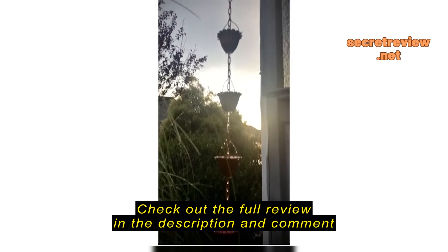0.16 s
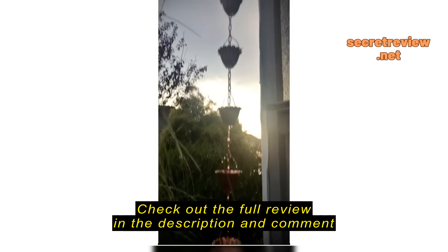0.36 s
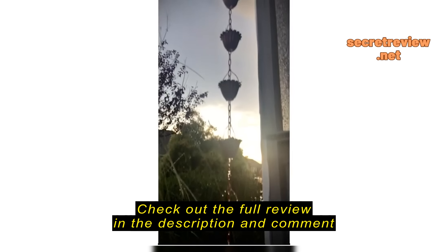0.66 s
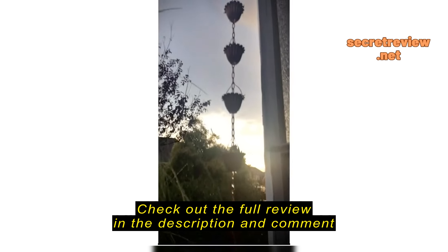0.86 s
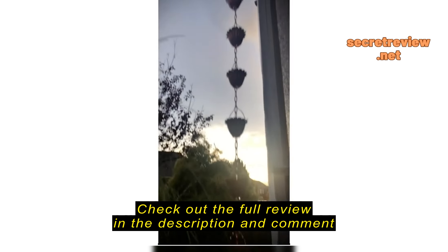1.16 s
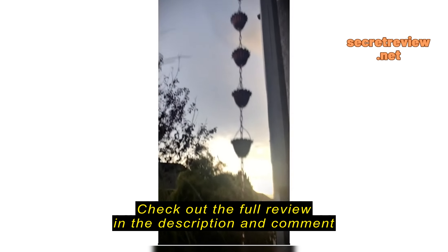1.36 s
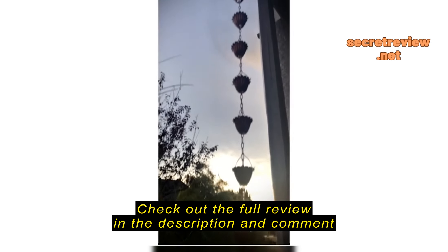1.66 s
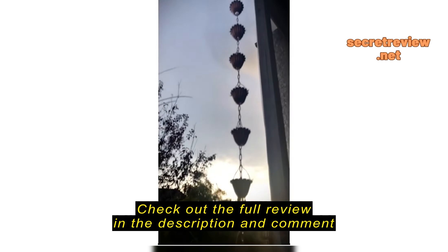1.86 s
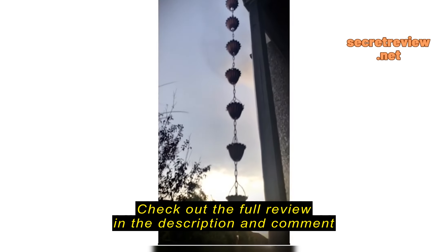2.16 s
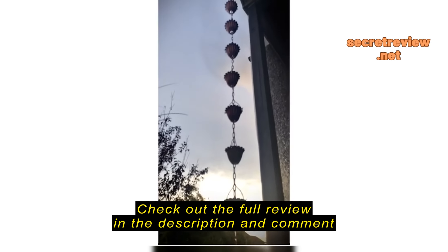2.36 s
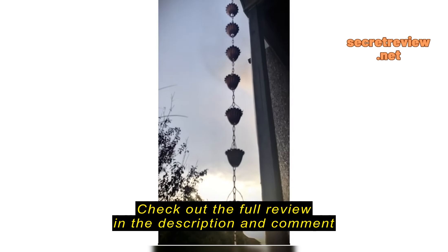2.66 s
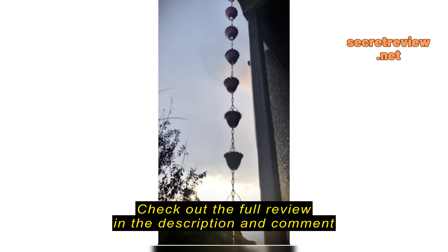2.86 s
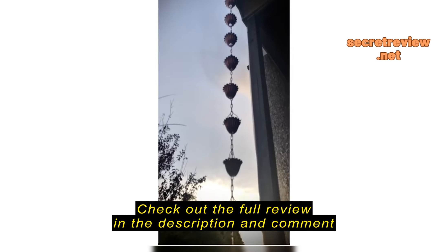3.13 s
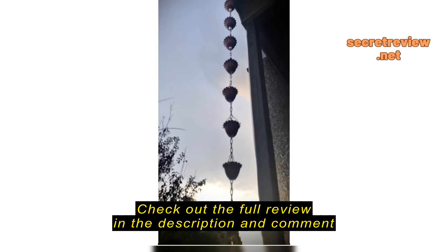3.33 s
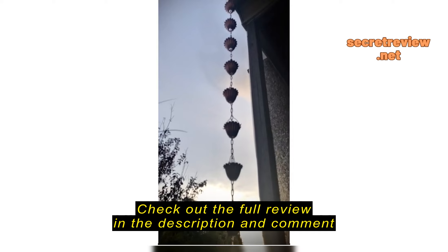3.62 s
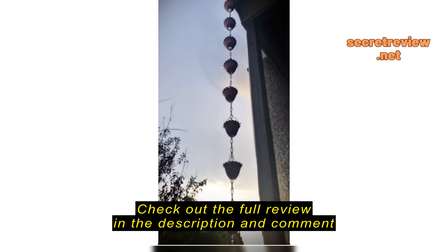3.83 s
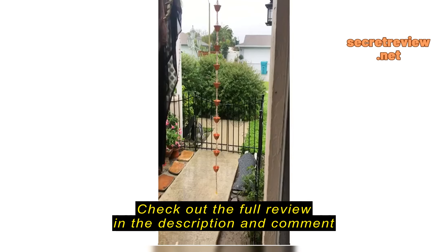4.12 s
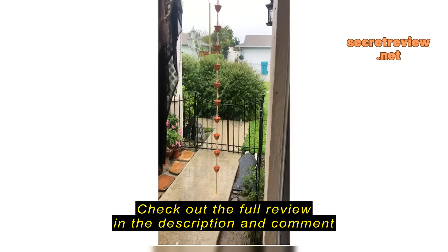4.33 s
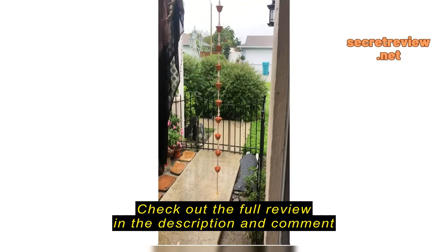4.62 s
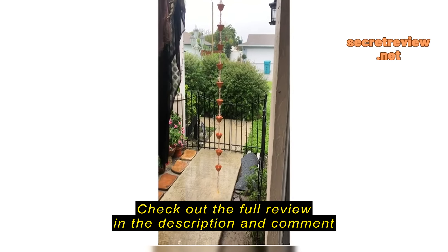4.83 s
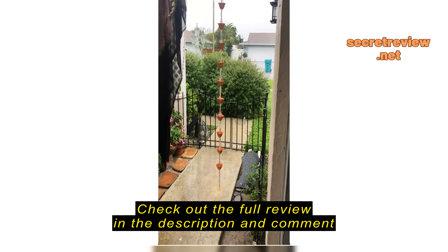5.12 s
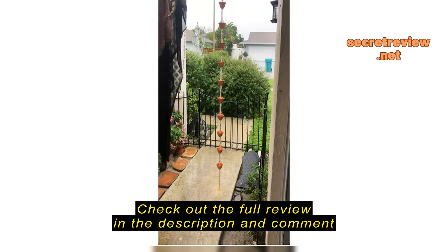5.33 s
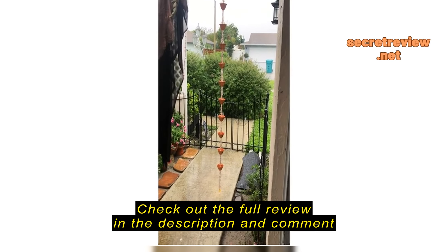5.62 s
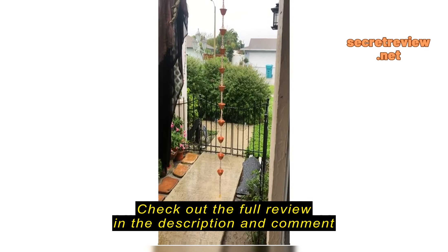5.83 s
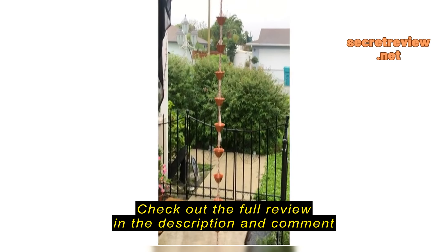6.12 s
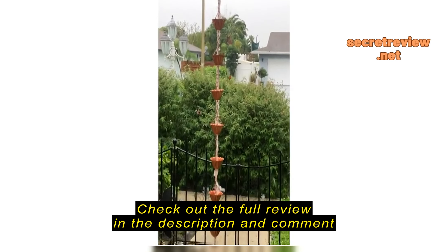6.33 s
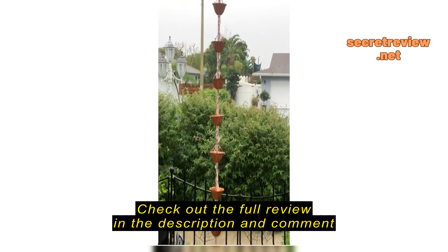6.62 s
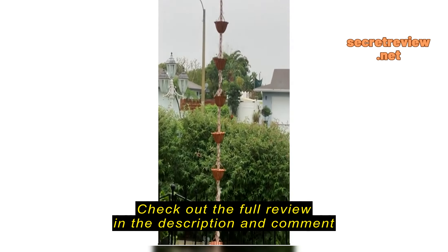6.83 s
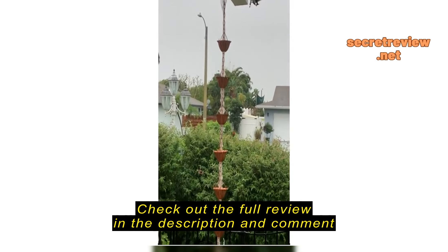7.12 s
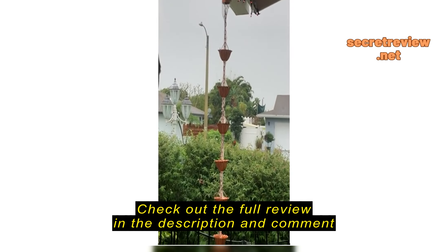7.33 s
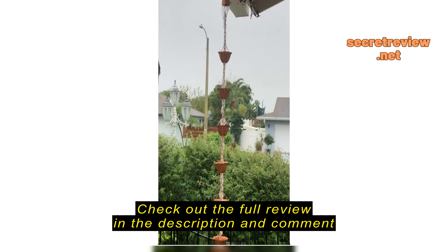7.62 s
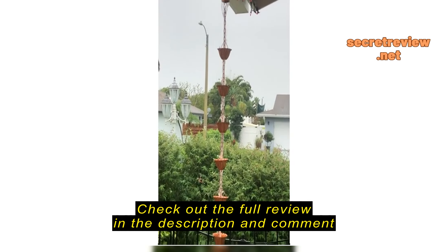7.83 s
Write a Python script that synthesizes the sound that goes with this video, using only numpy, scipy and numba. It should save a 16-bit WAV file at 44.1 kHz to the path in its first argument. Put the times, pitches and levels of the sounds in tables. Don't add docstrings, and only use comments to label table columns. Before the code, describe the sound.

Quiet evening rumble with insects, faint hum and stray drips cuts briefly to silence, then close rain splashes and gurgles down a metal cup chain.

```python
import sys
import numpy as np
from scipy import signal
from scipy.fft import rfft, irfft
from scipy.io import wavfile
from scipy.ndimage import uniform_filter1d
from numba import njit

SR = 44100
rng = np.random.default_rng(int(sys.argv[2]) if len(sys.argv) > 2 else 0)


def digitize_waveform(pressure):
    field = np.atleast_2d(pressure).T
    bounded = np.clip(field, -1, 1)
    quanta = np.round(bounded * 32767).astype(np.int16)
    wavfile.write(sys.argv[1], SR, quanta)


def decibels_to_gain(level_db):
    exponent = np.asarray(level_db, float) / 20
    return 10 ** exponent


N = 351918
T = np.arange(N) / SR
EVENING_END_S, RAIN_START_S = 3.9855, 4.0565
TOP_HZ = 16000


def level(x, db):
    return x * decibels_to_gain(db) / np.sqrt(np.mean(x ** 2))


def follow(table):
    return np.interp(T, *np.transpose(table))


def columns(table):
    return np.array(table, float).T.copy()


def colour(x, points):
    hz, db = np.transpose(points)
    f = np.maximum(np.fft.rfftfreq(N, 1 / SR), 1)
    return irfft(rfft(x) * decibels_to_gain(np.interp(np.log(f), np.log(hz), db)), N)


def peak(x, hz, width):
    f = np.fft.rfftfreq(N, 1 / SR)
    return irfft(rfft(x) / (1 + ((f - hz) / (width / 2)) ** 2), N)


def walk(rate):
    hold = int(SR / rate)
    steps = np.repeat(rng.standard_normal(N // hold + 1), hold)
    return 1.353 * uniform_filter1d(uniform_filter1d(steps, hold), hold)[:N]


def breathing(x, flicker_db, rate, order):
    spectrum, out, last = rfft(x), x, walk(rate)
    octave = np.log2(np.fft.rfftfreq(N, 1 / SR) + 1)
    for centre in np.arange(*order) / 2:
        new = walk(rate)
        band = irfft(spectrum * np.clip(1 - 2 * abs(octave - centre), 0, 1), N)
        out = out + (decibels_to_gain(flicker_db * (new + last)) - 1) * band
        last = new
    return out


@njit
def ring(s, hz, cycles, size, glide, rise):
    out = np.zeros(N)
    for e in range(len(s)):
        start, span = int(s[e] * SR), int(cycles[e] * SR / hz[e]) + 2
        z, w, late = size[e] + 0j, 2 * np.pi * hz[e] / SR, 1.
        p, turn = np.exp(1j * w - np.log(1000) / span), np.exp(1j * w * glide / span)
        for k in range(start, min(start + span, N)):
            out[k] += z.imag * (1 - late)
            z *= p
            p *= turn
            late *= np.exp(-1 / (rise * span))
    return out


def patter(count, spread_db, cycles):
    u = rng.random((count, 3)).T
    hz = 900 * 18 ** u[1]
    size = decibels_to_gain(spread_db * np.minimum(-np.log(1 - u[2]), 3.5)) * hz / 1000
    return level(ring(u[0] * N / SR, hz, cycles + 0 * hz, size, 0.26, 0.025), 0)


def drops(table, cycles, glide, spread, rise, crack_db):
    s, db, hz = columns(table)
    out = ring(s, hz, cycles + 0. * s, decibels_to_gain(db + 4.0), glide, rise)
    out += ring(s, 1.03 * hz, 3.5 + 0 * s, decibels_to_gain(db + crack_db), .1, .08)
    u = rng.random((len(s), 5, 2))
    pitch = np.clip(hz[:, None] * np.exp(spread * (u[..., 0] - .45)), 800, TOP_HZ)
    late = 0.1486 * u[..., 1] * (cycles / hz)[:, None]
    times, size = (s[:, None] + late).ravel(), np.repeat(decibels_to_gain(db - 5), 5)
    return out + ring(times, pitch.ravel(), np.full(size.size, .6 * cycles), size, glide, rise)


def splashes(table, shower_db, cycles, spray_s, spray_width):
    s, db, hz = columns(table)
    turns = cycles + 0 * s
    out = ring(s, hz, turns, decibels_to_gain(db + 5.5), 0.076, 0.097)
    out += ring(s + .0024, hz, turns, decibels_to_gain(db), 0.098, 0.054)
    out += ring(s, 1.14 * hz.clip(0, 12000), 7.7 + 0 * s, decibels_to_gain(db - 1.5), .1, 0.096)
    spray_db = shower_db - 0.01 * (db + 35.0)
    u = rng.random((len(s), 110, 3))
    late = 3 * spray_s * u[..., 0] ** 1.5
    pitch = np.clip(hz[:, None] * np.exp(spray_width * (u[..., 1] - .62)), 900, 16500)
    size = decibels_to_gain((db + spray_db)[:, None] - 3.5 + 9.7 * u[..., 2]) * np.exp(-late / spray_s)
    times = (s[:, None] + late).ravel()
    return out + ring(times, pitch.ravel(), np.full(size.size, 17.0), size.ravel(), 0.31, 0.065)


def porch(x, echo_db):
    t = T[:SR // 4]
    t60_s = 0.1
    tail = rng.standard_normal(len(t)) * decibels_to_gain(-60 * t / t60_s) * (t > .002)
    return x + decibels_to_gain(echo_db) * signal.fftconvolve(x, tail / np.sqrt(np.sum(tail ** 2)))[:N]


def tone(hz, width, db):
    phase = 2 * np.pi * np.cumsum(hz + width * walk(7)) / SR
    return np.sqrt(2) * np.sin(phase) * decibels_to_gain(db + 1.4 * walk(7.4))


def beat(hz, top_s):
    return 20 * np.log10(1 + 0.28 * np.cos(2 * np.pi * hz * (T - top_s)))


# frequency in Hz, level in dB per Hz.
TOWN_AIR = [(18, -40), (30, -21), (55, -1), (109, -1.5), (311, -9), (374, -8.5), (437, -12), (569, -15.5),
            (913, -16), (1280, -21.5), (1390, -22), (2900, -28), (6210, -33.5), (12000, -43),
            (16000, -51.5)]


def town():
    air = colour(rng.standard_normal(N) + 0.31 * patter(count=4000, spread_db=3.0, cycles=42.0), TOWN_AIR)
    return level(breathing(air * decibels_to_gain(.5 * walk(15)), 0.49, 11, order=(16, 29)), -45.7)


# pitch in Hz, width in Hz, level in dB.
INSECTS = [
    (6170, 98, -75),
    (5100, 480, -74),
    (1282, 6.6, -70.5),
]


def insects():
    return sum(level(peak(rng.standard_normal(N), hz, width) * decibels_to_gain(1.7 * walk(5.7)), db)
               for hz, width, db in INSECTS)


def evening_hum():
    swell = np.exp(-((T - 3.34) / 0.53) ** 2)
    compressor_db = -66 + 10.5 * swell
    mains_db = -53.5 + beat(1.74, 2.01)
    return tone(118.4, 2.17, mains_db) + tone(377, 2.41, compressor_db)


# start in seconds, peak in dB, pitch in Hz.
PLOPS = [(.266, -50, 990), (.339, -41, 1085), (.5084, -51, 985), (.648, -43, 1700), (.657, -45, 1720),
         (.665, -40, 1055), (1.3049, -51, 1050), (2.0448, -49, 1080), (2.332, -38.5, 1070),
         (3.7708, -51, 960)]
DRIPS = [(0.3336, -52, 3200), (0.384, -36, 6800), (0.3987, -42, 3640), (0.417, -43, 3870),
         (0.429, -43, 3070), (0.4928, -44, 3080), (0.508, -46, 3900), (0.5384, -47, 3490),
         (0.7138, -52, 3910), (0.8315, -47, 5240), (1.49, -53, 4600), (1.6656, -46, 6700),
         (2.068, -46, 3720), (2.074, -44, 6170), (2.2244, -46, 6260), (2.2413, -41, 6400),
         (2.3042, -49, 2590), (2.5555, -44, 2690), (2.8784, -49, 3650), (3.2685, -37, 6510),
         (3.3578, -49, 2950)]
TICKS = [(0.2014, -43, 10200), (0.2214, -46, 13700), (0.383, -42, 8300), (0.603, -56, 8350),
         (0.831, -42, 14500), (0.8312, -48, 10500), (1.2176, -57, 9540), (1.5294, -51, 8000),
         (1.7335, -52, 8790), (2.1455, -55, 10400), (2.2408, -49, 9110), (2.4204, -55, 12800),
         (3.0964, -56, 9060), (3.1507, -50, 10200), (3.268, -53, 8010), (3.8701, -65, 8210)]
# start in seconds, peak in dB, pitch in Hz.
PINGS = [(.400, -43, 4700), (.420, -47, 4800), (.434, -46, 2950), (.493, -45, 3900), (.509, -47, 2250),
         (.511, -46, 4800), (.479, -47, 1500), (.604, -49, 6600), (1.8495, -41, 1650), (1.8525, -39, 2150),
         (3, -50, 3200), (2.656, -45, 2320), (2.656, -36, 2900), (2.659, -37, 3700), (2.656, -49, 1700),
         (3.5795, -44, 3000), (3.5805, -40, 3880), (3.5805, -41, 4700), (3.582, -46, 6700)]
# start in seconds, peak in dB, first pitch in Hz, climb
CHIRPS = [
    (.473, -44, 1156, 1.0),
    (1.53, -36.5, 3600, 0.43),
]


def drips():
    deep = drops(PLOPS, 70, .07, .14, .1, -14)
    for *row, climb in CHIRPS:
        deep = deep + drops([row], 40, climb, .3, .14, -14)
    s, db, hz = columns(PINGS)
    deep = deep + ring(s, hz, 40 + 0 * s, decibels_to_gain(db + 6), 0.038, 0.092)
    thin = drops(DRIPS, 40, .15, .45, .08, -6) + drops(TICKS, 30, .1, .7, .05, 1)
    return porch(decibels_to_gain(-0.5) * deep + decibels_to_gain(3.0) * thin, echo_db=-8)


def evening():
    return town() + insects() + evening_hum() + drips()


# frequency in Hz, level in dB per Hz.
RAIN = [(18, -39), (30, -15), (97, -0.5), (188, -6.5), (247, -8.5), (314, -12), (369, -8.5), (588, -13.5),
        (1400, -11), (1820, -43), (3080, -120)]


def rain_rush():
    rush = level(colour(rng.standard_normal(N), RAIN), -47)
    low = signal.butter(4, 1000, fs=SR, output="sos")
    return signal.sosfilt(low, breathing(rush, 0.3, 8, order=(14, 21)))


# pitch in Hz, width in Hz, level in dB, beat in Hz,
# top of the beat in seconds.
HUM_LINES = [(119.2, 1.17, -54, 0.93, 5.94), (96.9, 0.91, -52.5, 0.78, 7.5), (241.2, 0.14, -52, 0.32, 5.52),
             (482.2, 1.04, -61, 0.6, 6.18), (262, 1.22, -59.5, 0.6, 5.65), (187.3, 1.47, -63.5, 0.53, 7.6)]
# time in seconds, level in dB.
MAINS = [(4.06, -44.5), (4.7, -47.5), (5.0, -52), (5.45, -46.5), (5.7, -53), (5.95, -53), (6.4, -64),
         (6.9, -47), (7.5, -51), (7.98, -49)]
# pitch in Hz, width in Hz, level at full load in dB.
COMPRESSOR = [(378.6, 1, -51.5), (362.4, 0.58, -53), (286.2, 0.88, -57.5)]
# time in seconds, level in dB.
LOAD = [(4.06, -2.5), (4.5, -0.5), (4.72, -8.5), (4.9, -1.5), (5.3, -8.5), (6.25, 1), (6.5, -3.5),
        (6.75, -13), (7.98, -16)]


def machines():
    out = tone(58.9, 0.66, follow(MAINS))
    for hz, width, db, beat_hz, top_s in HUM_LINES:
        out = out + tone(hz, width, db + beat(beat_hz, top_s))
    load_db = follow(LOAD)
    for hz, width, db in COMPRESSOR:
        out = out + tone(hz, width, db + load_db)
    rattle = level(peak(rng.standard_normal(N), 515, 150), -56)
    return out + rattle * decibels_to_gain(1.4 * load_db)


# frequency in Hz, level in dB per Hz.
SPRAY = [(470, -34), (800, -15), (1120, -11), (1520, -4), (2500, -10.5), (3590, -2), (4160, -2),
         (5200, -0.5), (7460, -8), (9440, -3), (12200, -7), (14700, -6), (15800, -6.5)]
# time in seconds, flow in dB.
FLOW = [(4.06, -0.5), (4.25, -2), (4.45, 0), (4.6, -1.5), (4.85, -1), (5.15, -1), (5.3, 1.5), (5.55, -1),
        (5.9, 0.5), (6.2, -1), (6.55, -1), (6.9, -0.5), (7.15, -0.5), (7.4, 0.5), (7.58, 1), (7.7, -1.5),
        (7.98, 1)]
# time in seconds, level in dB.
MIST = [(4.06, -1.5), (4.2, 0), (4.3, 0.5), (4.42, 0.5), (4.6, 1), (4.67, -1), (5.0, -0.5), (5.1, 1.5),
        (5.32, -4), (5.45, -0.5), (5.65, -2), (6.2, 1), (6.68, -0.5), (7.0, 0), (7.41, -1), (7.53, 2.5),
        (7.7, -1.5), (7.98, 1)]
FLOW_HZ = [1000, 2800, 7500, 17000]
# level at flow 0 in dB, change in dB per dB of flow.
WATERS = [
    (-48.5, -0.5),
    (-45, 1),
    (-47.5, 0.5),
]


def running_water():
    grains = rng.standard_normal(N) + 0.3 * patter(count=6000, spread_db=1.5, cycles=16.5)
    grains = grains + 0.31 * patter(count=2500, spread_db=3.5, cycles=29.0)
    water = breathing(colour(grains, SPRAY) * decibels_to_gain(.45 * walk(24)), 1.14, 18, order=(20, 29))
    flow_db, out = follow(FLOW), 0
    for lo, hi, (db, follows) in zip(FLOW_HZ, FLOW_HZ[1:], WATERS):
        band = signal.sosfilt(signal.butter(3, [lo, hi], "band", fs=SR, output="sos"), water)
        swell_db = follows * flow_db
        if lo == FLOW_HZ[2]:
            swell_db = swell_db + follow(MIST)
        out = out + level(band, db) * decibels_to_gain(swell_db)
    return out


# start in seconds, peak in dB, pitch in Hz.
SNAPS = [(4.1651, -29, 14500), (4.302, -31, 11000), (4.46, -33, 13500), (4.817, -31, 5500),
         (5.0526, -31, 14400), (5.2875, -30, 14000), (5.3772, -19, 5900), (5.3815, -25, 5600),
         (6.0872, -23, 6600), (6.5938, -28, 11500), (7.025, -33, 11000), (7.512, -24, 11500)]
SPILLS = [(4.375, -42, 6000), (4.378, -42, 10000), (4.565, -39, 6000), (4.575, -40, 13500),
          (5.725, -39, 6000), (5.765, -42, 12500), (6.395, -42, 13000), (6.60, -41, 6000),
          (6.795, -43, 6000), (6.80, -42, 14000), (7.135, -43, 14000), (7.515, -40, 13000)]


def snaps_and_spills():
    s, db, hz = columns(SNAPS)
    return ring(s, hz, 16 + 0 * s, decibels_to_gain(db + 5), .1, .1) + splashes(SPILLS, 2.0, 14, .03, .7)


def slops(count):
    u = rng.random((count, 3))
    s = RAIN_START_S + u[:, 0] * (T[-1] - RAIN_START_S)
    return np.c_[s, -39 + 1.5 * u[:, 1], 3500 * 4 ** u[:, 2]]


# start in seconds, peak in dB, pitch in Hz.
SLAPS = [(4.0726, -31, 3750), (4.1305, -31, 6440), (4.2572, -29.5, 4860), (4.2994, -30, 5600),
         (4.5624, -37, 5380), (4.7039, -22.5, 5360), (4.774, -24.5, 5640), (4.8178, -29, 4970),
         (5.0862, -24.5, 6400), (5.2171, -11.5, 5560), (5.377, -25, 5470), (5.4428, -29, 3580),
         (5.47, -29.5, 4530), (5.5767, -33, 5000), (5.7269, -24.5, 5040), (5.753, -26, 5120),
         (6.0866, -20, 5160), (6.3264, -29, 5030), (6.418, -26.5, 5500), (6.5925, -29, 5300),
         (6.612, -26, 4760), (6.7017, -27, 5850), (6.9715, -28, 6200), (7.0474, -25, 6230),
         (7.229, -28, 3640), (7.2797, -22.5, 5800), (7.437, -31, 4270), (7.5105, -22, 5470),
         (7.644, -26, 6560), (7.7749, -22.5, 5250)]
SPITS = [(4.0736, -28.5, 8850), (4.1655, -36, 15000), (4.2642, -28.5, 10400), (4.4553, -31.5, 8990),
         (4.5894, -28, 9720), (4.78, -26.5, 11800), (5.0524, -28, 14400), (5.0789, -29.5, 9900),
         (5.2165, -21, 9500), (5.2869, -30, 14000), (5.3482, -22.5, 15100), (5.3758, -23, 8500),
         (5.444, -23, 15300), (5.579, -28, 10100), (5.7453, -26, 8300), (6.0581, -30, 10400),
         (6.0871, -23, 10300), (6.1898, -26.5, 13200), (6.2138, -31, 11500), (6.2834, -27, 8800),
         (6.3946, -26.5, 11700), (6.5934, -28, 8700), (6.7042, -30.5, 10740), (6.983, -29.5, 9360),
         (7.0469, -23, 9300), (7.3648, -26, 13600), (7.468, -30, 7700), (7.512, -23, 12700),
         (7.5418, -27, 10300), (7.8625, -29, 10600)]
DABS = [(4.8913, -34, 4870), (4.94, -38, 5870), (5.0694, -32, 3530), (5.0984, -30, 6550),
        (5.6715, -36, 3810), (6.0496, -34, 3560), (6.1874, -33, 5200), (6.2208, -33, 4240),
        (6.2394, -37, 5840), (6.394, -40, 4650), (6.54, -34, 3850), (6.7894, -38, 4850), (7.144, -32, 3600),
        (7.3402, -33.5, 3770), (7.3672, -28, 6390), (7.4674, -30, 3450), (7.862, -35, 3580),
        (7.9294, -30.5, 3680)]
FLECKS = [(4.3016, -32, 11400), (4.3111, -26, 9300), (4.555, -30, 10200), (4.7022, -30, 9750),
          (4.9367, -35, 8500), (4.9761, -33, 8440), (5.0874, -31, 9510), (5.0964, -27, 8860),
          (5.3574, -26, 9870), (5.4714, -27, 9500), (5.6635, -35, 8340), (5.7029, -30, 9610),
          (5.8092, -35, 11000), (5.9035, -36, 9770), (6.5724, -35, 11200), (6.8608, -31, 9660),
          (6.9197, -35, 8800), (6.9406, -35, 10200), (7.1062, -29, 8490), (7.1332, -29, 10900),
          (7.1896, -30, 10200), (7.2489, -34, 10100), (7.341, -30, 8530), (7.4465, -30, 9670),
          (7.5894, -32, 14000), (7.6474, -28, 12100), (7.7742, -30, 7840), (7.9444, -36, 9580)]
SPLATS = [(5.2175, -28.5, 2120), (5.229, -32, 2200), (5.232, -27, 3950), (5.2195, -25, 3930),
          (6.0866, -34.5, 3620), (7.5105, -30, 2600), (7.521, -29, 5000), (7.776, -32, 3400)]
GURGLES = [(4.116, -34, 1780), (4.7526, -35, 1980), (4.7844, -35, 1870), (5.135, -39, 1450),
           (5.344, -36, 1810), (5.6194, -32, 1610), (5.751, -42, 2490), (5.8197, -34, 1730),
           (5.9259, -32, 1910), (6.0646, -33, 1360), (6.1095, -37, 1840), (6.316, -33, 1510),
           (6.5894, -36, 1640), (7.1157, -35, 1530), (7.775, -36, 1560)]


def slugs():
    out = splashes(slops(count=40), -16, 13, 0.022, 0.88)
    out += splashes(DABS, -14, 12, .02, 1.12)
    out += splashes(FLECKS, -10.5, 15, .015, 0.67)
    out += splashes(SPLATS, -8.5, 5.1, .028, 0.86)
    out += splashes(SLAPS, -15, 17.0, 0.03, 1.31)
    out += splashes(SPITS, -5.5, 18.4, 0.033, 0.97)
    out += drops(GURGLES, 34.7, 0.12, 0.64, 0.17, -19)
    return porch(out, echo_db=-5)


def rain():
    return rain_rush() + machines() + running_water() + snaps_and_spills() + slugs()


# start in seconds, length in seconds, lowest Hz apart.
APART = [(0.197, .06, 5200), (.375, .035, 4500), (0.804, 0.032, 5500), (1.076, 0.042, 4200),
         (3.42, 0.035, 6000), (4.137, 0.021, 5200), (4.445, .03, 5700), (4.65, .033, 12400),
         (5.041, 0.033, 5200), (5.205, 0.013, 5000), (5.333, 0.022, 5200), (6.074, .025, 6000),
         (6.377, 0.065, 200), (6.907, 0.025, 5800), (7.007, 0.074, 4940), (7.328, .03, 5000),
         (7.37, 0.093, 11900), (7.452, 0.036, 5400), (7.756, 0.038, 5200)]


def difference(mid):
    other, side = np.roll(mid, 1500), np.zeros(N)
    spells = [(s, length, above_hz, -8) for s, length, above_hz in APART]
    spells.append((.85, 2.5, 13000, -6))
    for s, length, above_hz, db in spells:
        at = slice(int(s * SR), int((s + length) * SR))
        high = signal.butter(8, above_hz, "high", fs=SR, output="sos")
        fade = signal.windows.tukey(len(side[at]), min(0.024 / length, 1))
        side[at] += decibels_to_gain(db) * signal.sosfilt(high, other[at]) * fade
    return side


def scene():
    mid = evening() * (T < EVENING_END_S) + rain() * (T > RAIN_START_S)
    side = difference(mid)
    return np.array([mid + side, mid - side])


def roll_off(x):
    return signal.sosfilt(signal.butter(12, 16520, fs=SR, output="sos"), x)


def record(dry):
    dry = signal.sosfilt(signal.butter(2, 36, "high", fs=SR, output="sos"), dry)
    dry = signal.sosfilt(signal.ellip(10, .3, 60, TOP_HZ, fs=SR, output="sos"), dry)
    return roll_off(dry)


dry = scene()
out = record(dry)
digitize_waveform(out)
```